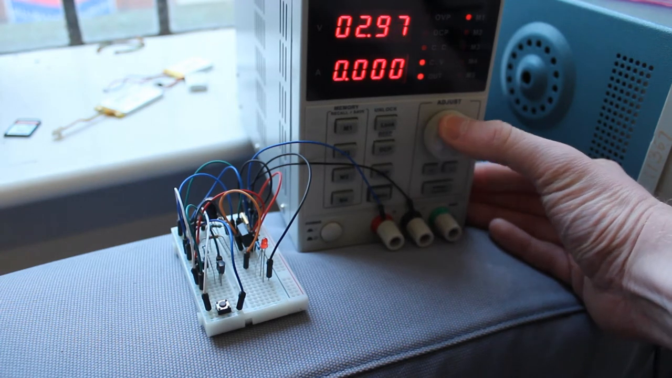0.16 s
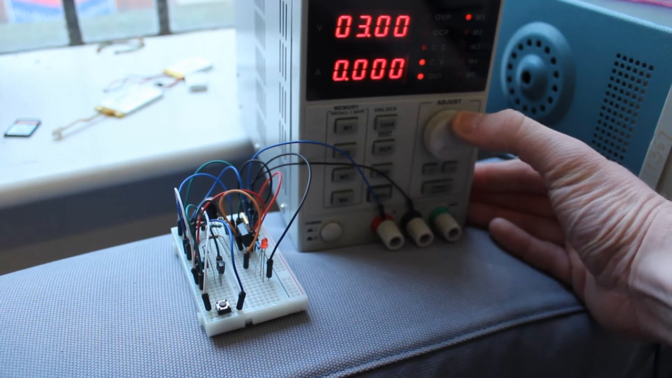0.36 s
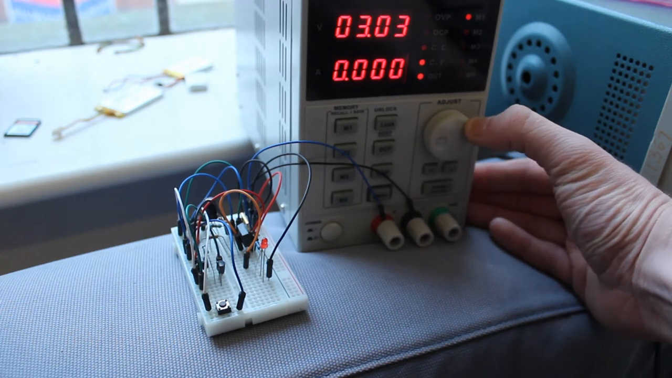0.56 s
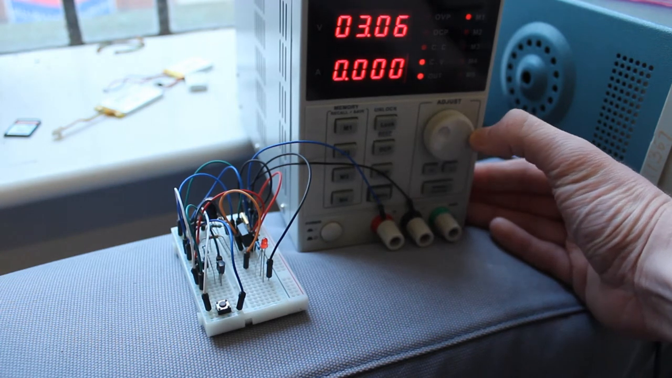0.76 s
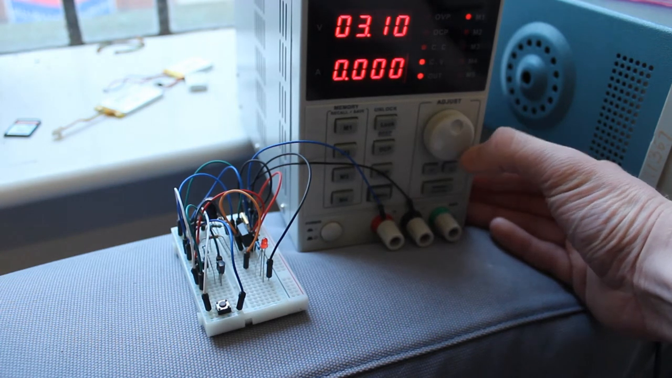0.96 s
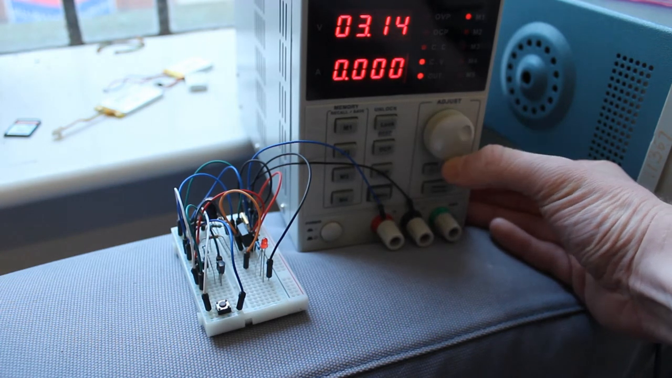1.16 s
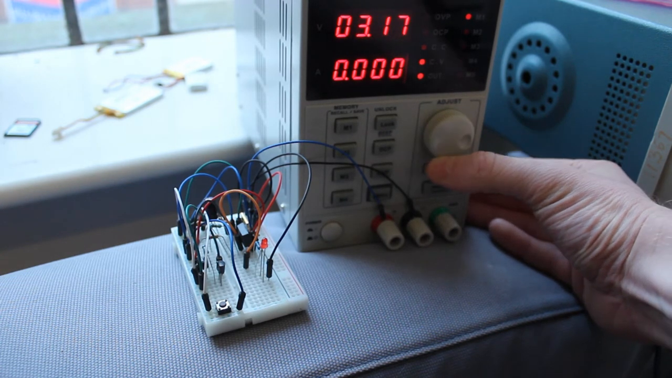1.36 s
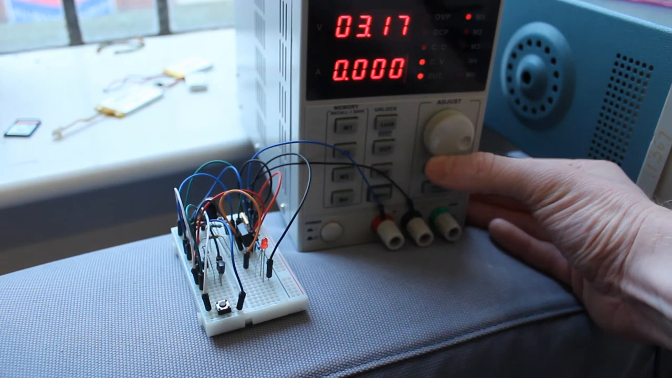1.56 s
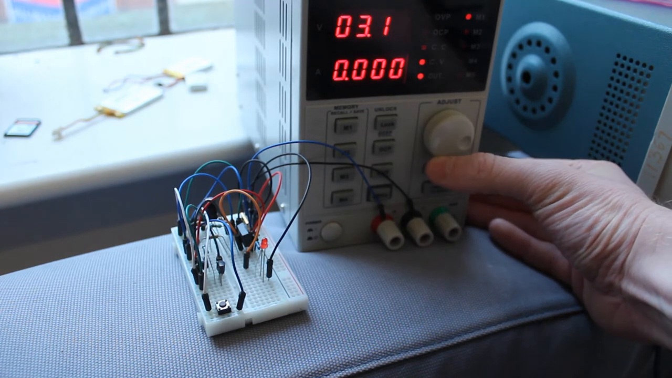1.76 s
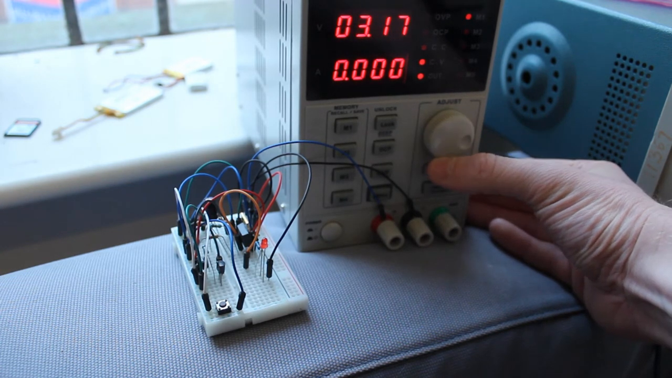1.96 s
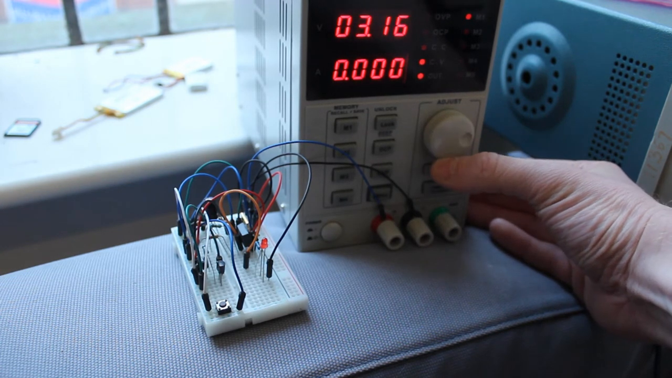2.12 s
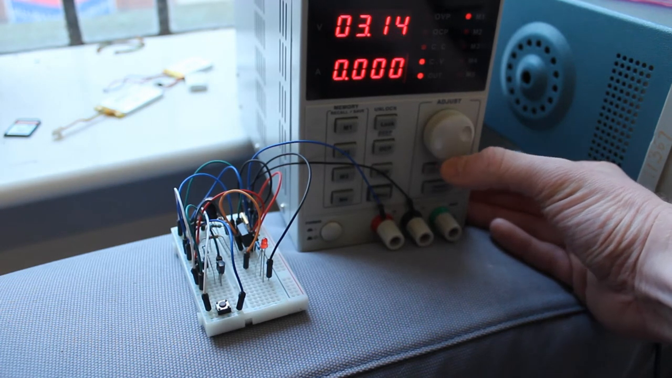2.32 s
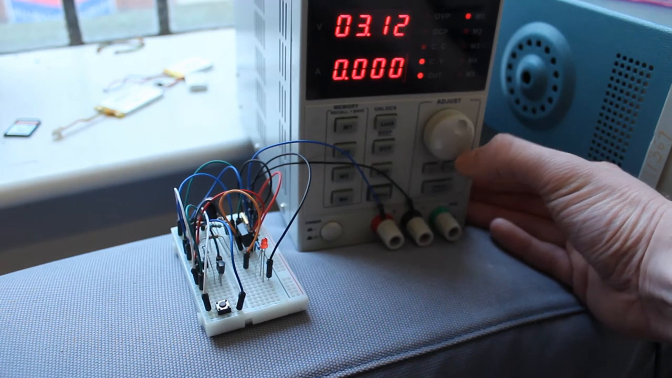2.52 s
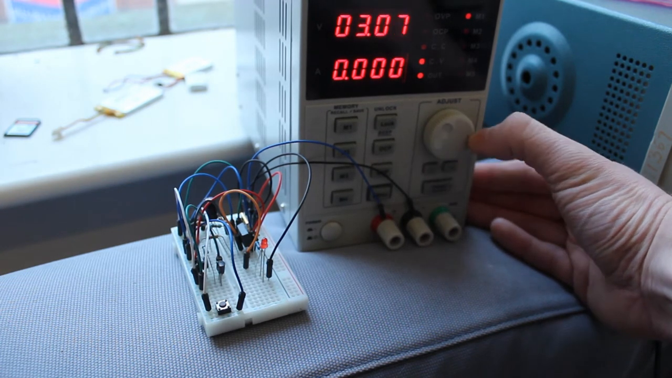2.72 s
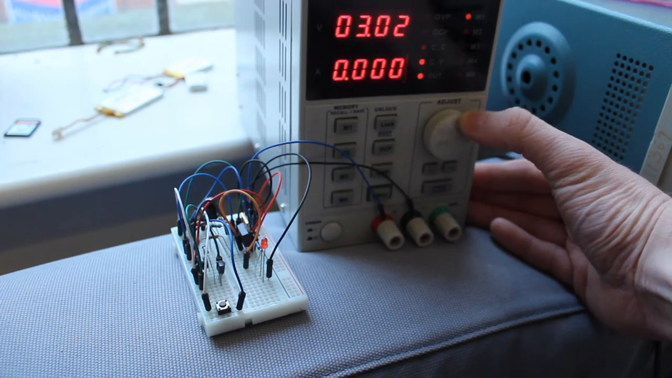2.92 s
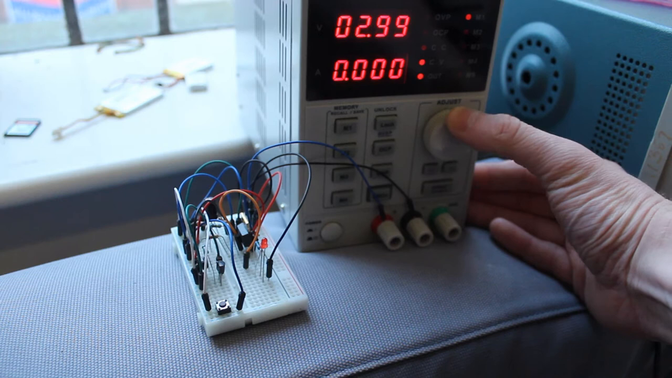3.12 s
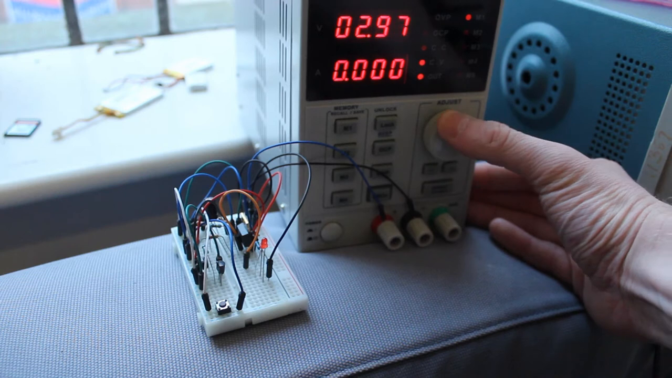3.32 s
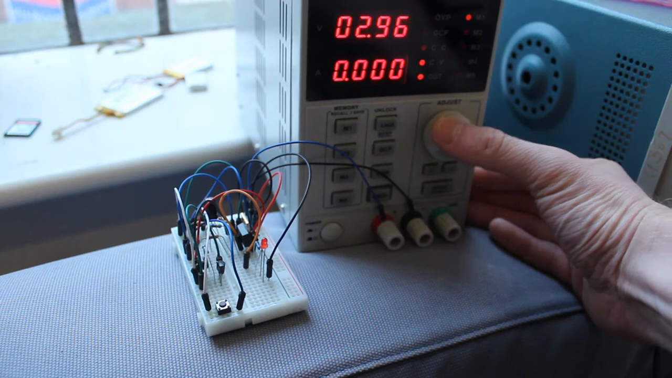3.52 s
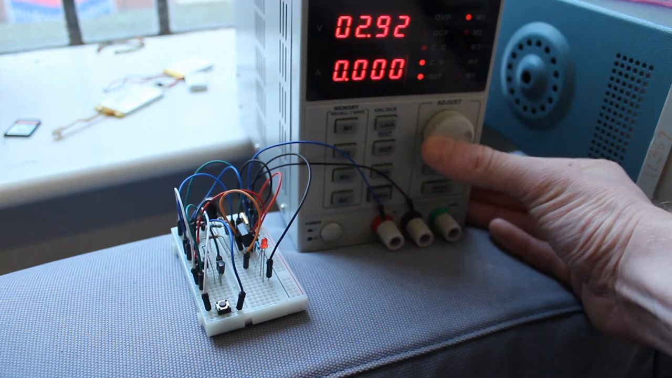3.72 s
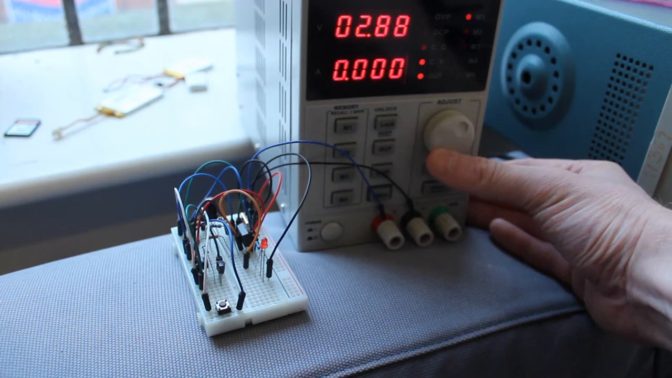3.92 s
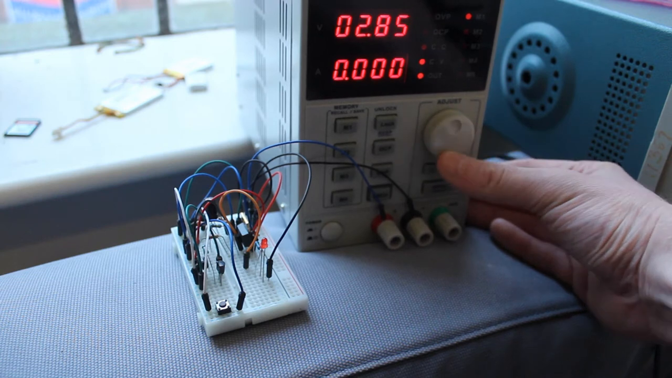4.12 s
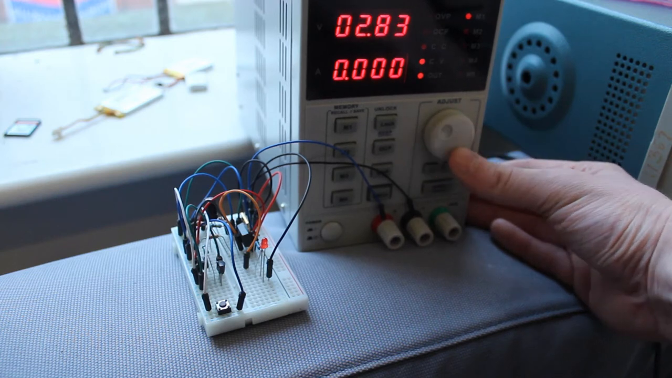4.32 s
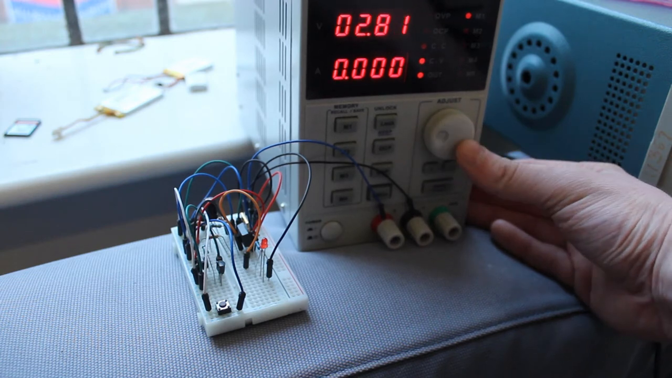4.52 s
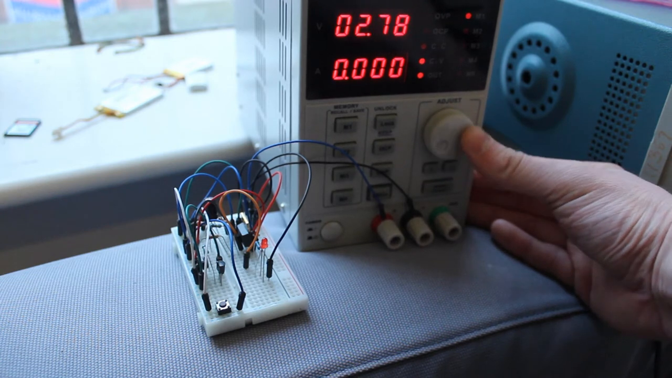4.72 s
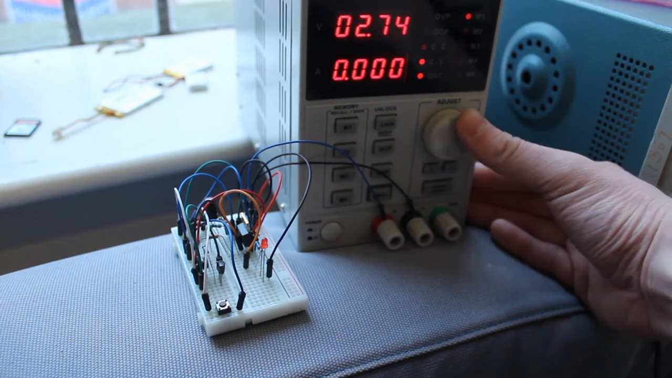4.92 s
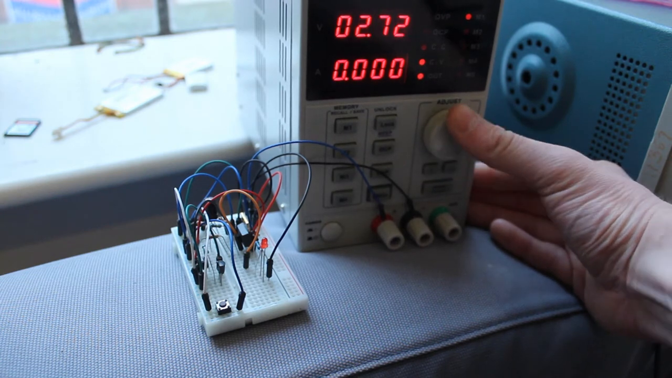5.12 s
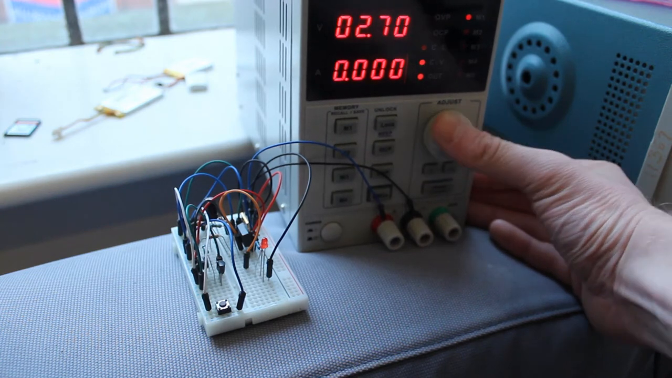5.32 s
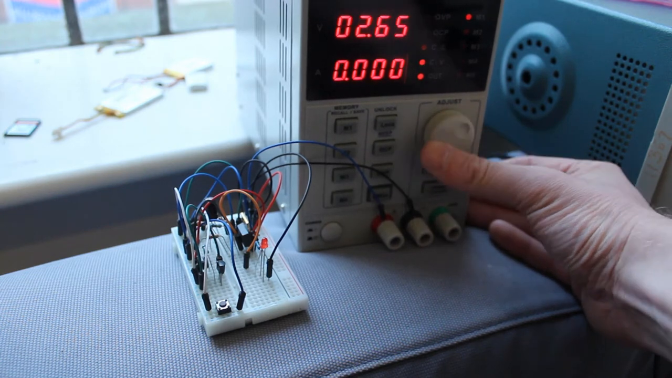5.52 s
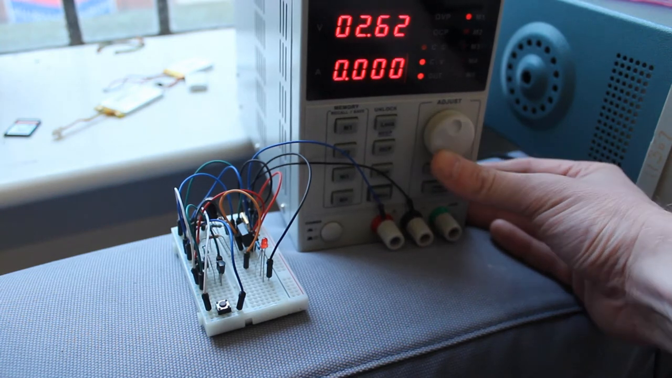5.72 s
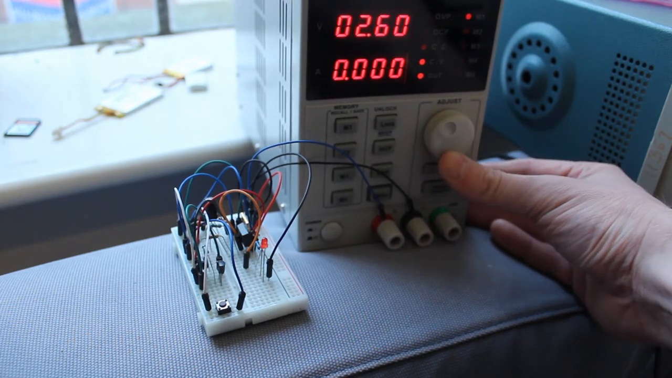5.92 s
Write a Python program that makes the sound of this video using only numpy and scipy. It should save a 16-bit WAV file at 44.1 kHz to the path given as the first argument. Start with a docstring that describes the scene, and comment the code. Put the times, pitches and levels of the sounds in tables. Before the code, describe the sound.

A knob on a power supply clicks in quick, uneven runs as it is turned, over a faint fan whir and hum.

```python
"""A cooling fan whirrs and the mains hum throughout, as a hand turns the detented knob of a bench
power supply close by. At each detent a spring snaps into its notch and excites the resonances of the
encoder and the case; a small room reverberates. After 1.4 s the knob rests, and at 2.1 s a longer run
of clicks begins. At 4.6 s the thumb rubs as it takes a new grip, and the clicks go on to the end."""
import sys
import numpy as np
from scipy import signal
from scipy.fft import rfft, irfft
from scipy.io import wavfile
from scipy.ndimage import uniform_filter1d

SR = 44100
rng = np.random.default_rng(int(sys.argv[2]) if len(sys.argv) > 2 else 0)


def put_to_file(sound):
    """Save the sound as 16-bit audio at rate SR, in the file named by the first command-line argument."""
    columns = np.atleast_2d(sound).T  # one column per channel
    safe = np.clip(columns, -1, 1)
    whole_steps = np.round(safe * 32767)
    wavfile.write(sys.argv[1], SR, whole_steps.astype(np.int16))


N = 267642
LEAD = SR // 4  # samples before time zero, so that the room already rings


def knob(size=2048, scatter=0.34, pitch_spread=0.0013, mode_spread_db=1.57,
         crack_db=-35, crack_hz=2600, blur=2.33):
    """Modal resonance: each snap rings encoder and case. Returns the direct and the all-round sound."""
    # snaps of the spring: start_s, level_db, hardness (about 0-1), treble_db, case_knock_db
    detents = [(-0.06, -23, 0, 0.5, -2), (0.1371, -22, 0.4, 0.5, -2), (0.2258, -22.5, 0.044, -0.5, -3),
               (0.2988, -22.5, 0.0, 2, 1), (0.3712, -21.5, 1, 4, 0.0), (0.4255, -21.5, 0.89, 0.5, 0),
               (0.4754, -22.5, 0.26, -2, 0.0), (0.5394, -22.5, 0.22, 0.1, -6),
               (0.6051, -22.5, 0.1, -0.5, -3), (0.6663, -22.5, 0.1, 2, 6), (0.7424, -22, 0.2, 1.5, -2.0),
               (0.8264, -21.5, 0.71, 0.5, 5.0), (0.8597, -22.5, 0, 1, -2), (0.9047, -21.5, 0.5, 0, 3),
               (0.9608, -22, 0.1, 0.7, 7), (1.0152, -22.5, 0.48, 0, 10), (1.0764, -22.5, 0.2, -1.5, 1.0),
               (1.1314, -23, 0.5, 0, 9), (1.1906, -23.5, 0.54, 2, 11), (1.2313, -22, 0.045, 0.9, 0),
               (1.3012, -22.5, 0.29, -1, 11), (1.3541, -22, 0.2, 1, 6), (2.1236, -22, 1.02, 3.5, 13),
               (2.26, -22, 0.2, 0.4, -4), (2.355, -22.5, 0.06, 0.1, -1), (2.4182, -22.5, 0.2, 0.3, -2),
               (2.499, -22, 0.1, -0.1, -3), (2.5682, -22.5, 0.33, 0, -8), (2.6003, -22, 0.15, -0.5, -2),
               (2.6876, -22, 0.1, 1, -1.0), (2.721, -22.5, 0.053, 2.5, 7), (2.7392, -22, 0.1, -1, -2),
               (2.8284, -23, 0.0, -1, -3.0), (2.8548, -22, 0.1, -0.8, -5), (2.9235, -22, 1.1, 0.1, -1),
               (2.9472, -22, 0.1, 0, -1.0), (2.961, -22.5, 0.19, -1, -2), (3.0022, -22, 0.4, 1.5, 4.0),
               (3.069, -22, 0.17, 2, -1.0), (3.1014, -22, 0.071, 3, 3), (3.206, -23, 0.65, -3.5, 6.0),
               (3.3189, -21.5, 1.14, 2.9, -1), (3.4481, -22, 0.17, 1.2, 2.0),
               (3.572, -22.5, 0.23, 0.5, 3.5), (3.6235, -22.5, 0.0, 1.4, 5), (3.6814, -22, 0.5, 0, 8),
               (3.7213, -22.5, 0.11, 3.5, 4), (3.7711, -22, 0.16, 0.5, -4), (3.8163, -22.5, 0.5, 4, 6.0),
               (3.8752, -22, 1.07, 1.5, 0), (3.9389, -22.5, 0.26, 1, 5), (4.0016, -22, 0.39, 3.5, 4),
               (4.0865, -22, 0.5, 2, 0), (4.1677, -22, 0.33, 2.5, -1), (4.244, -22, 0.19, 1.5, -2),
               (4.3157, -22, 0.0, -1, -4), (4.3816, -22, 0.0, 1, -3), (4.4518, -22, 0.17, -0.6, -5),
               (4.603, -22, 0.3, 1, -6), (4.6432, -22, 0.0, 1, -3), (4.7573, -21.5, 0.36, 0.5, -6),
               (4.7853, -23, 1.4, 3, 2.0), (4.8108, -21.5, 0, 0.2, -3), (4.903, -22, 0.065, -3, -6),
               (4.9452, -22, 0.052, 0, -1.0), (5.009, -22, 0.16, 1.5, -5), (5.0764, -22, 0.0, -0.7, -2),
               (5.1979, -22, 0.33, 2.5, 2), (5.3529, -22, 0.089, -1, -2.0), (5.4223, -22, 0.4, 2, 8),
               (5.4387, -22, 0.0, 1, 7), (5.4594, -21.5, 0.022, -3, 9), (5.4775, -22, 0.61, 0.5, 6.0),
               (5.5451, -23, 0.29, -3, 10), (5.5707, -22, 0.2, 1, 4), (5.615, -23, 0.49, 0, 10),
               (5.691, -22, 0.098, 1, -0.0), (5.7716, -22, 0.0, 2.5, 1), (5.875, -22, 0.2, 2, 2),
               (6.0525, -22.5, 0.0, 0, -4)]
    # resonances of encoder and case: pitch_hz, bandwidth_hz, level_db, hard_snap_gain_db
    modes = [(1510, 460, -33, 2), (2077, 150, -22, 0), (2370, 103, -20, 3.5), (2833, 380, -24.5, 0.5),
             (3240, 197, -18.5, -0.5), (3844, 147, -5, 1), (3948, 187, -1, 1), (4336, 106, -12, -2.5),
             (4370, 160, -16.5, 3.5), (4760, 245, -17, 3), (5230, 220, -14.5, 0.5), (5450, 168, -12, 0),
             (5820, 190, -18, 8), (6010, 120, -25, 16), (6430, 170, -14, 0), (6710, 290, -10.5, -8.5),
             (6820, 300, -8, -8), (7080, 490, -23.5, 10.5), (8007, 254, -17, -5), (8360, 590, -27, 6.5),
             (9440, 650, -19, -1), (10060, 410, -25, 8.5), (10600, 150, -15.5, -2),
             (11230, 710, -15.5, -0.5), (11800, 600, -27, 11.5), (12150, 640, -14.5, -6),
             (12480, 200, -9.5, -1.5), (13480, 570, -17.5, 4), (14040, 470, -21, 4), (15400, 740, -19, 3)]
    t, f = np.arange(size) / SR, np.fft.rfftfreq(size, 1 / SR)
    pitch_hz, bandwidth_hz, mode_db, hard_db = np.transpose(modes)[:, :, None]
    common_chatter = chatter(t)
    # a small part radiates little bass
    crack = undb(crack_db) * (f ** 2 + 1e4) / (f ** 2 + crack_hz ** 2)
    treble_shape = along([(4000, 0.096), (9000, 0.97)], f)
    knock_shape = along([(2100, 0.69), (2400, 0.31)], f)
    out = np.zeros((2, LEAD + N + size))
    for start_s, level_db, hardness, treble_db, knock_db in detents:
        tuned_hz = pitch_hz * (1 + pitch_spread * rng.standard_normal())
        spread_db = mode_spread_db * rng.standard_normal(pitch_hz.shape)
        strength = undb(mode_db + hardness * hard_db + spread_db)
        tilt = undb(treble_db * treble_shape + knock_db * knock_shape)
        contacts = rfft(common_chatter + scatter * chatter(t))
        start = LEAD + int(start_s * SR)
        # one direction hears sharp peaks and notches; summed over all directions they blur
        for path, width_hz in enumerate((bandwidth_hz, bandwidth_hz * blur)):
            peaks = strength / (1 + (2 * (f - tuned_hz) / width_hz) ** 2)
            response = tilt * np.sqrt(np.sum(peaks ** 2, axis=0) + crack ** 2)
            click = irfft(minimum_phase(response) * contacts)
            onset_rms = np.sqrt(np.mean(click[:SR // 100] ** 2))  # first 10 ms
            out[path, start:start + size] += undb(level_db) * click / onset_rms
    return out[:, :LEAD + N]


def chatter(t, rise_s=.0003, snap_decay_s=.0013, rebound_s=.0023, rebound_gain=.8,
            rebound_decay_s=.0017, passes=12):
    """Impact excitation: the spring lands and rebounds in two dense, spectrally flat contact bursts."""
    snap = (1 - np.exp(-t / rise_s)) * np.exp(-t / snap_decay_s)
    rebound = (t > rebound_s) * np.exp(-np.abs(t - rebound_s) / rebound_decay_s)
    envelope = snap + rebound_gain * rebound
    force = envelope * rng.standard_normal(len(t))
    for _ in range(passes):
        force = irfft(np.exp(1j * np.angle(rfft(force))))  # equal strength at every frequency
        local_rms = np.sqrt(np.abs(uniform_filter1d(force ** 2, size=25)) + 1e-14)
        force = force * envelope / local_rms  # kept inside the two bursts
    return force / np.linalg.norm(force)


def thumb(band_hz=(750, 1900)):
    """Sliding friction: skin rubs over the plastic and gives a brief, uneven band of noise."""
    # changes of grip: centre_s, half_width_s, level_db
    rubs = [(4.622, 0.015, -45.5)]
    t = np.arange(N) / SR
    grip = sum(undb(db) * np.exp(-((t - centre_s) / width_s) ** 2) for centre_s, width_s, db in rubs)
    friction = rng.standard_normal(N) * undb(3 * walk(250))
    bandpass = signal.butter(2, band_hz, "band", fs=SR, output="sos")
    return grip * unit(signal.sosfilt(bandpass, friction))


def room(source, first_s=0.002, near_gain=2.05, near_decay_s=0.0023, bands=14):
    """Reverberation: nearby equipment reflects first, then the walls; the treble dies soonest."""
    # time for the reflections to fall by 60 dB: frequency_hz, t60_s
    decay_times = [(2000, 0.83), (4000, 0.48), (7000, 0.46), (11000, 0.29), (16000, 0.39)]
    # spectrum of the reflections: frequency_hz, gain_db
    colour = [(2000, -8), (3000, -13), (3550, -9.5), (3950, -11), (4500, -7.5), (5400, -9.5), (6700, -10),
              (9000, -12), (11500, -10), (14500, -18.5)]
    t = np.arange(SR * 3 // 5) / SR
    f = np.fft.rfftfreq(len(t), 1 / SR)
    noise = rfft(rng.standard_normal(len(t)))
    edges_hz = np.linspace(0, SR / 2, bands + 1)
    tail = 0
    for low, high in zip(edges_hz, edges_hz[1:]):
        t60_s = along(decay_times, (low + high) / 2)
        band = irfft(noise * (f >= low) * (f < high), len(t))
        tail = tail + band * np.exp(-np.log(1000) * t / t60_s)
    tail = tail * (t > first_s) / np.linalg.norm(tail)
    tail = tail * (1 + near_gain * np.exp(-np.abs(t - first_s) / near_decay_s))
    tail = irfft(rfft(tail) * undb(along(colour, f)), len(t))
    return signal.fftconvolve(source, tail)[:len(source)]


def fan(air_db=-43.5, flutter_db=.5):
    """Flow noise: air rushes through the case, with mains hum and wavering blade tones on top."""
    # spectrum of the rushing air: frequency_hz, relative_density_db
    air_spectrum = [(25, -11), (70, -13.5), (130, -15.5), (220, -8), (370, -6.5), (490, 2), (620, -8),
                    (750, -2.5), (1000, -13), (1800, -16.5), (2250, -16.5), (2800, -23), (7000, -34.5),
                    (15000, -38)]
    # mains hum and fan tones: pitch_hz, rms_level_db, waver (0-1)
    tones = [(49.5, -53.5, 0), (100, -65, 0.13), (232, -60, 0.46), (325.3, -63.5, 0.5), (345, -60.5, 0.6),
             (508.5, -56.5, 0.5), (575.5, -60, 1), (719, -60.5, 0.25), (890, -62, 0.58),
             (2144, -66.5, 0.88)]
    t, f = np.arange(N) / SR, np.fft.rfftfreq(N, 1 / SR)
    air = unit(irfft(rfft(rng.standard_normal(N)) * undb(along(air_spectrum, f)), N))
    out = air * undb(air_db + flutter_db * walk(10))
    for pitch_hz, level_db, waver in tones:
        steady = np.sqrt(1 - min(waver, 1) ** 2)
        drift = waver * (walk(11) + 1j * walk(12)) / np.sqrt(2)  # in amplitude and phase
        carrier = np.exp(2j * np.pi * (pitch_hz * t + rng.random()))
        out = out + undb(level_db) * np.sqrt(2) * np.real((steady + drift) * carrier)
    return out


def minimum_phase(gain):
    """Minimum phase: the spectrum of the quickest causal ring that has this gain."""
    cepstrum = irfft(np.log(gain))
    half = len(cepstrum) // 2
    cepstrum[1:half] *= 2
    cepstrum[half + 1:] = 0
    return np.exp(rfft(cepstrum))


def walk(rate_hz):
    """Random modulation: levels held for 1 / rate_hz seconds and smoothed twice, at rms 1."""
    hold = int(SR / rate_hz)
    steps = np.repeat(rng.standard_normal(N // hold + 1), hold)
    return unit(uniform_filter1d(uniform_filter1d(steps, hold), hold)[:N])


def along(points, hz):
    """Interpolation of (frequency_hz, value) points on a logarithmic frequency axis."""
    f, value = np.transpose(points)
    return np.interp(np.log(np.maximum(hz, 1)), np.log(f), value)


def undb(db):
    """Decibels to amplitude ratio."""
    return 10 ** (np.asarray(db) / 20)


def unit(x):
    """Normalisation to rms 1."""
    return x / np.sqrt(np.mean(x ** 2))


def scene():
    """Superposition: knob and thumb, their reverberation and the fan add in one channel."""
    direct, all_round = knob() + np.pad(thumb(), (LEAD, 0))
    return ((direct + room(all_round))[LEAD:] + fan())[None]


def record(dry, ceiling=0.31, top_hz=15750):
    """Soft saturation rounds the highest peaks; a low-pass filter then cuts the top."""
    lowpass = signal.ellip(8, .2, 70, top_hz, fs=SR, output="sos")
    return signal.sosfilt(lowpass, ceiling * np.tanh(dry / ceiling))


dry = scene()
out = record(dry)
put_to_file(out)
```